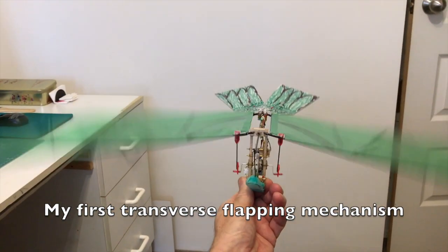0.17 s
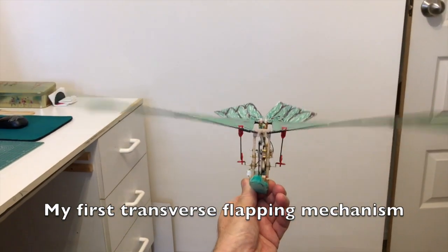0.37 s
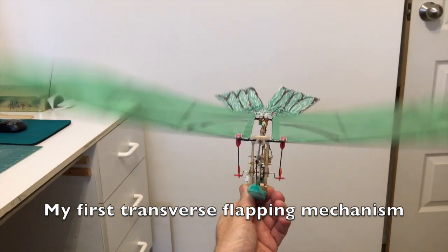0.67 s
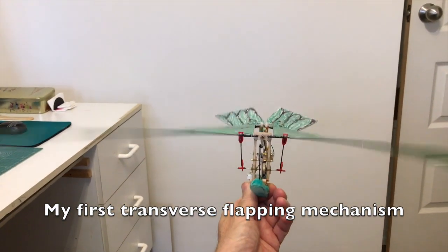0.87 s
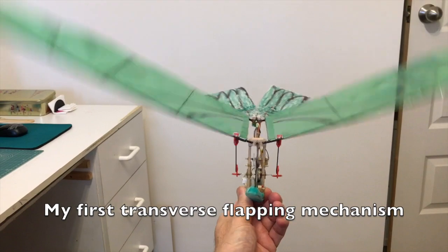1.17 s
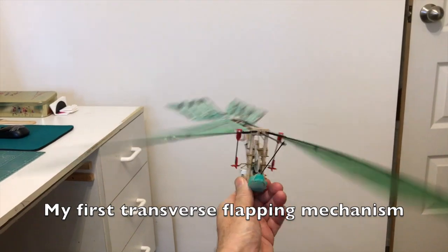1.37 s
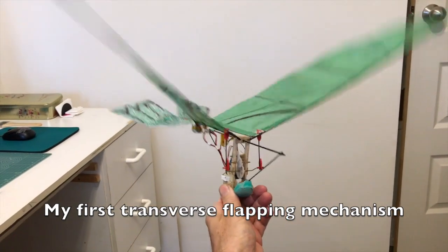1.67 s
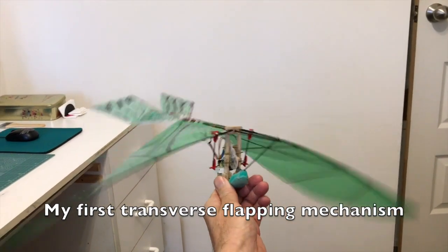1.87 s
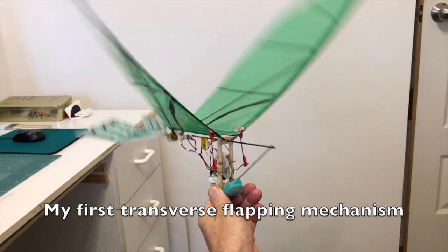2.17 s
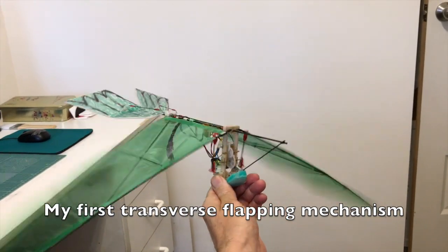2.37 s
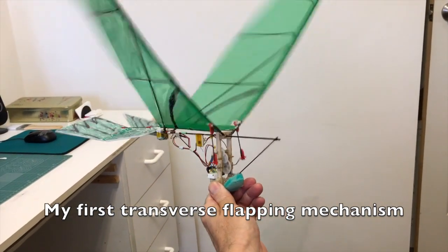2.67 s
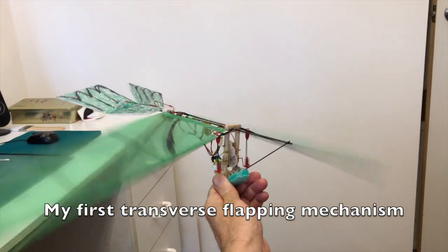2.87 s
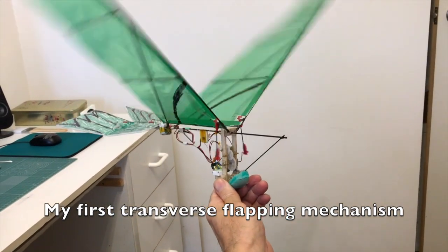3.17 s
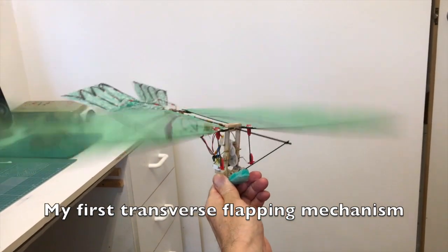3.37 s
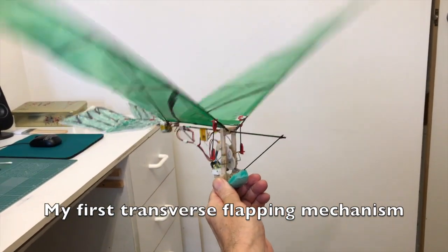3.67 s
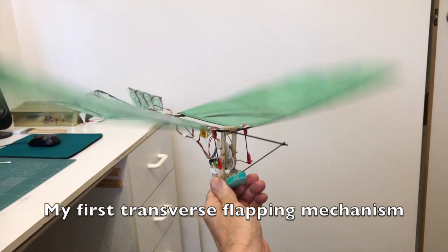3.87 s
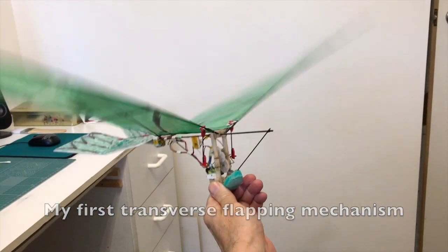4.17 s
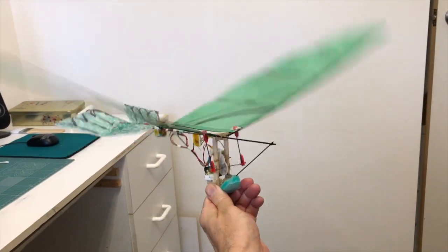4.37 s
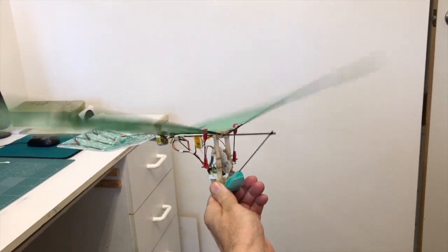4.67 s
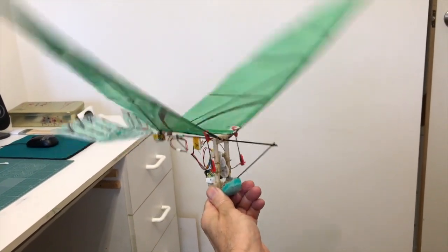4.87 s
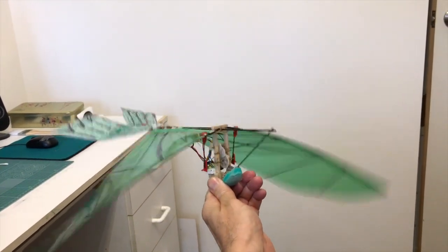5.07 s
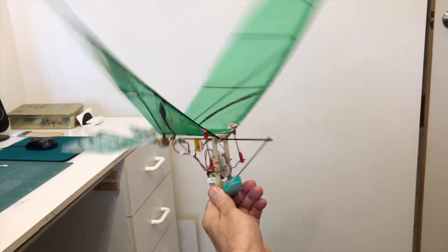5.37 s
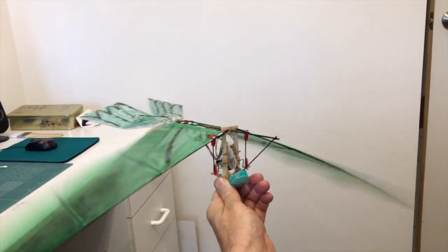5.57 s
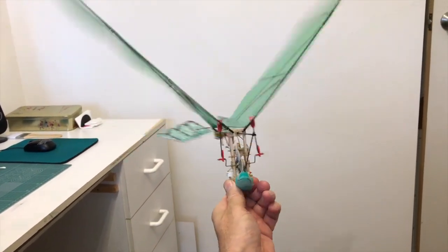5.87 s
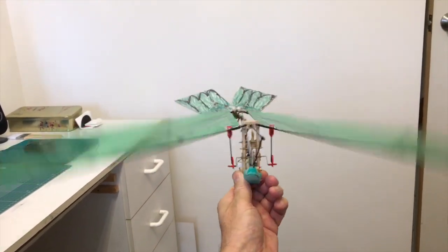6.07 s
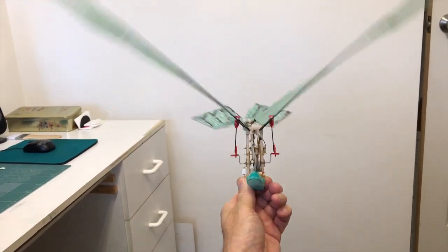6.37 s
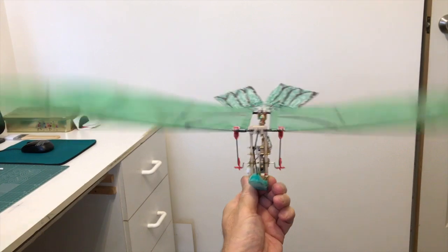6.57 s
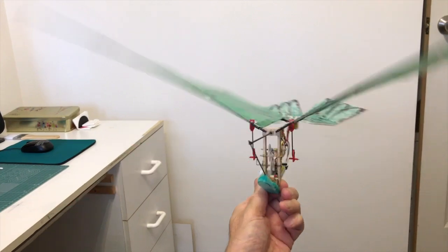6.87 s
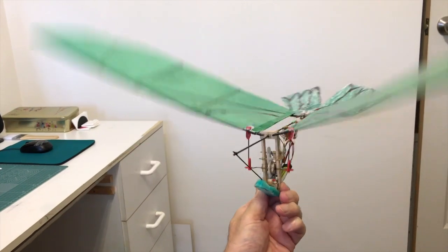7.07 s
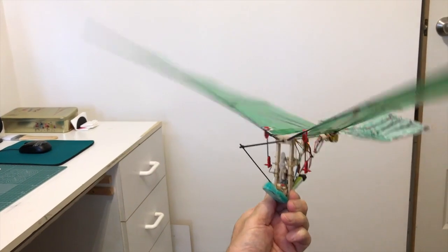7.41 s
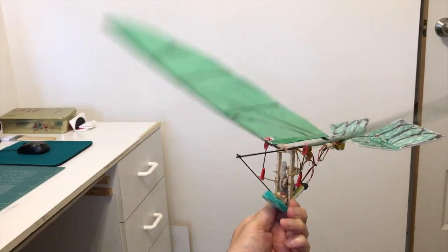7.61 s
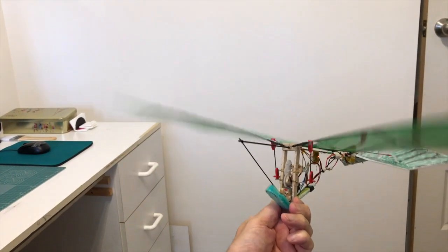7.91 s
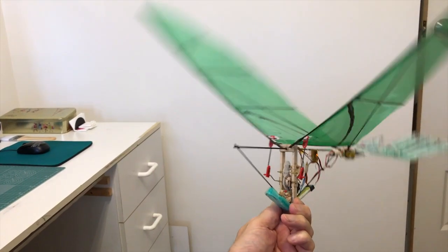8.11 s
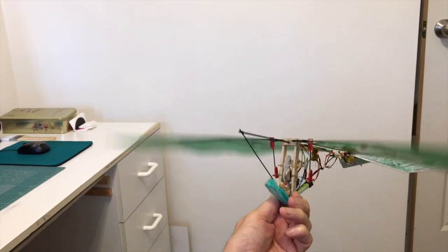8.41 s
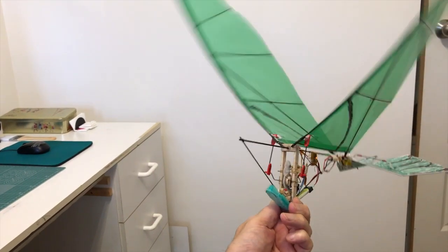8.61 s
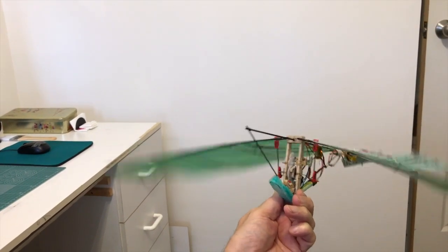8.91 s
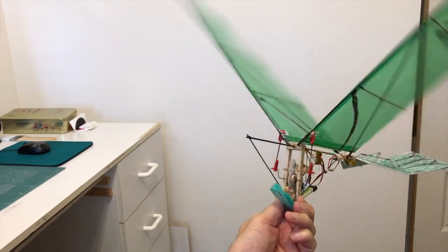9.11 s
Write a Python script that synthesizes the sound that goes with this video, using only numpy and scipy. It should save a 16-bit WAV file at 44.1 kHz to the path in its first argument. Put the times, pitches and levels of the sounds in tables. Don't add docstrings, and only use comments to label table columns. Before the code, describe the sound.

From 0 seconds a hand-held model with two film wings is already flapping, close to a phone microphone in a small, briefly reverberant room. Its little servos make a nasal, gritty gear whine: each stroke jumps up to around 2 kHz, sags a little, races to roughly 5 kHz, then brakes abruptly almost to nothing and reverses. One full beat lasts about 0.54 seconds, with two whirrs per beat. Loose teeth rattle harshly, especially while braking; small dry plastic ticks fall early in the upstroke, often in pairs, varying in strength. Wings thump softly and airily at each reversal, with a thin high electronic fizz. Around 1.5 to 5.5 seconds it sounds slightly farther off; near 6.25 it dulls a touch as it turns, then from about 7 to 9 it is nearer and brighter, ticks weaker around 7.7. Faint low room noise lies beneath, and the flapping continues steadily to the end.

```python
import sys
import numpy as np
from scipy import signal
from scipy.fft import rfft, irfft, next_fast_len
from scipy.io import wavfile
from scipy.ndimage import uniform_filter1d, map_coordinates

SR = 44100
rng = np.random.default_rng(int(sys.argv[2]) if len(sys.argv) > 2 else 0)


def rack_gain(trim_db):
    fader = np.asarray(trim_db, float)
    return 10 ** (fader / 20)


def master_out(mix):
    frames = np.transpose(np.atleast_2d(mix))
    ceiling = np.clip(frames, -1, 1)
    pcm = np.round(ceiling * 32767).astype(np.int16)
    wavfile.write(sys.argv[1], SR, pcm)


N = 407925

# linkage tick in seconds, downstroke brake in seconds, tick level in dB,
# second tick level in dB, motor speed in percent.
BEATS = [(-0.341, 0.086, -27, -25, 101), (0.197, 0.626, -23, -15, 97), (0.737, 1.163, -22.5, -21, 100.7),
         (1.28, 1.702, -20, -21, 101.5), (1.811, 2.241, -22, -31, 101.6), (2.35, 2.773, -20, -39, 101.4),
         (2.881, 3.305, -20.5, -35, 102.7), (3.413, 3.841, -25, -35, 100), (3.954, 4.373, -22, -34, 100.6),
         (4.48, 4.91, -17.5, -33, 100.6), (5.019, 5.449, -18.5, -28, 100), (5.56, 5.992, -27, -32, 99),
         (6.098, 6.524, -19, -17.5, 100), (6.635, 7.064, -22.5, -20, 100), (7.181, 7.607, -27, -22, 103),
         (7.727, 8.158, -35, -35, 103), (8.271, 8.7, -33, -28, 101), (8.811, 9.243, -28, -22, 102.5)]
BEAT_MARKS = [.097, .89]
# share of the beat, tooth rate in Hz, mesh load in dB.
UPSTROKE = [(0, 397, -52), (.045, 1460, -40.5), (.097, 2045, -39), (.147, 1800, -39.5), (.21, 2324, -39),
            (.285, 4110, -52), (.333, 5220, -45), (.368, 4110, -39), (.4, 2000, -40.5)]
# share of the beat, tooth rate in Hz, mesh load in dB.
DOWNSTROKE = [(.46, 100.1, -93), (.52, 1454, -43.5), (.565, 1932, -39.5), (.648, 1351, -44.5),
              (.78, 2117, -38.5), (.83, 3404, -54), (.862, 4818, -44.5), (.907, 2298, -36.5),
              (.96, 150.4, -78)]
REVERSALS = [0.399, 0.932]
# multiple of the tooth rate, level in dB.
GEAR_TONES = [(.5, -3.5), (.75, -14), (1, 1), (2, -4), (3, -6), (4, -16), (5, -12.5)]
# centre in Hz, width in Hz, level in dB.
CASE_MODES = [(1680, 360, -14), (1993, 690, -6), (2395, 284, 3), (3683, 390, -2), (4640, 730, -5),
              (6060, 1950, -9), (9200, 200, -37), (9660, 640, -4.5)]
# centre in Hz, width in Hz, level in dB.
FRAME_MODES = [(338, 37, 1), (482.4, 22, 4), (629, 32, 3)]
# frequency in Hz, density in dB per Hz.
RATTLE_TONE = [(780, -32), (1050, -14), (1450, -13), (1670, -8), (2380, -0.5), (2850, -4.5), (3700, -1.5),
               (4900, -7.5), (5500, -4), (7700, -13), (8300, -8.5), (9850, -11.5), (10500, -16.5),
               (14200, -25), (15500, -18.5)]
# centre in Hz, width in Hz, level in dB.
COVER_MODES = [(979, 42, -0.5), (1127, 28, 4), (1668, 27, 5.5), (2416, 66, -3.5), (3580, 170, -14),
               (5600, 480, -22), (9370, 710, -16)]
LINK_HZ = [3580, 5800]
# frequency in Hz, density in dB per Hz.
THUMP_TONE = [(30, -22), (55, -2), (130, 0.5), (320, -0.5), (600, -1.5), (1100, -4), (2000, -2),
              (3000, -60)]
# frequency in Hz, density in dB per Hz.
FIZZ_TONE = [(9000, -17.5), (10500, -12), (11000, -6.5), (11500, -7.5), (12300, -1), (12750, -12),
             (13000, -2), (13250, -12), (13550, -0.5), (14200, -48), (15200, -12), (15800, -22)]
# time in seconds, nearness in dB, how far the motors face the phone in dB.
HAND = [(0, 1, -0.9), (1.3, 0.74, -1.6), (1.7, 0.3, -1.2), (2.6, 0.2, 0.5), (3.5, 0.2, 1.3), (4.2, 0, 0),
        (5.1, 0.06, 0), (5.7, 0.55, .1), (6.25, 0.24, -2.6), (6.8, 0.64, 0), (7.4, 0.8, 1.7), (8, 1, 1.5),
        (8.6, 1, 1.5), (9.25, 0.9, 0.5)]
# frequency in Hz, time to fall 60 dB in seconds.
ROOM_DECAY = [(200, 0.33), (2000, 0.28), (10000, 0.21)]
# frequency in Hz, density in dB per Hz.
FLOOR_TONE = [(15, -43), (25, -13), (97, 6), (338, -14), (546, -49), (810, 0), (1080, 8), (1350, -8),
              (1500, 11), (1950, -16), (3300, -120)]


def beat_share():
    next_tick = 2 * BEATS[-1][0] - BEATS[-2][0]
    times = np.append(np.array(BEATS)[:, :2], next_tick)
    shares = np.append(np.arange(len(BEATS))[:, None] + BEAT_MARKS, len(BEATS) + BEAT_MARKS[0])
    return np.interp(np.arange(N) / SR, times, shares)


def strokes(beats):
    inertia_s, settle_s = 0.0049, 0.015
    full_brake_hz_per_s = 222000
    at, hz, db = np.transpose(UPSTROKE + DOWNSTROKE + [(1, *UPSTROKE[0][1:])])
    beat = np.minimum(beats.astype(int), len(BEATS) - 1)
    speed = np.array(BEATS)[beat, -1] / 100
    tooth_hz = rounded(beats % 1, at, hz) * speed
    tooth_hz = uniform_filter1d(tooth_hz, max(1, int(inertia_s * SR)))
    load_db = np.interp(beats % 1, at, db)
    braking = np.clip(-np.gradient(tooth_hz) * SR / full_brake_hz_per_s, 0, 1)
    late = max(2, int(settle_s * SR))
    return tooth_hz, load_db, uniform_filter1d(braking, late, origin=late // 2 - 1)


def gear_whine(tooth_hz, level_db, upper_db):
    pinion_teeth = 8
    drift = 0.018 * wobble(25) + 0.008 * wobble(300)
    teeth = 2 * np.pi * np.cumsum(tooth_hz * (1 + drift)) / SR
    rotor = np.sin(teeth / pinion_teeth)
    fast_db = np.clip(16 * (tooth_hz / 1000 - 1.98), 0, 13) - upper_db
    tones = np.zeros(N)
    for multiple, db in GEAR_TONES:
        tone_db = db + 2.1 * wobble(90)
        if multiple > 1:
            tone_db = tone_db - fast_db
        if multiple > 2:
            tone_db = tone_db + 1.8 * upper_db
        tones += rack_gain(tone_db) * np.sin(multiple * teeth)
    tones = tones * (1 + 0.33 * rotor)

    def case(hz):
        return modes(CASE_MODES)(hz) / (1 + (1500 / (hz + 1)) ** 6)

    return filtered(rack_gain(level_db + 5.5) * tones, case) + rotor_hum(tooth_hz, rotor)


def rotor_hum(tooth_hz, rotor):
    swing = uniform_filter1d(tooth_hz, SR // 34) / 4800
    hum = rack_gain(-51 + 2.52 * wobble(70)) * swing ** 2.2 * rotor
    return filtered(np.roll(hum, SR // 150), modes(FRAME_MODES))


def tooth_rattle(tooth_hz, load_db, braking, near_db, treble_db):
    running = np.clip(tooth_hz / 2050, 0, 1)
    level_db = -46 + 6 * running + 7 * braking + 0.24 * running * (load_db + 40) + near_db
    grains_db = 1.5 * wobble(900) + 1.62 * wobble(70)
    chatter = coloured(rng.standard_normal(N) * rack_gain(grains_db), RATTLE_TONE)
    treble = filtered(chatter, lambda hz: 1 / (1 + (6200 / (hz + 1)) ** 6))
    brighter = rack_gain(treble_db - near_db + 3.5 + 4.5 * (tooth_hz / 2500 - 1))
    loose = rack_gain(level_db - 2.36) * (chatter - treble + brighter * treble)
    return patchy(loose + filtered(loose, modes(COVER_MODES)), patchy_db=1.83)


def linkage_ticks():
    second_joint_s = 0.111
    out, t = np.zeros(N + SR), np.arange(SR // 50) / SR
    for start, _, first_db, second_db, _ in BEATS[1:]:
        for s, db in [(start, first_db), (start + second_joint_s, second_db)]:
            hz = rng.choice(LINK_HZ) * rng.normal(1, 0.04)
            ring = 0.5 * np.sin(2 * np.pi * hz * t) + 0.55 * np.sin(2 * np.pi * 5600 * t)
            ring = ring * rack_gain(-60 * t / 0.0037)
            crack = 0.27 * rng.standard_normal(len(t)) * rack_gain(-60 * t / 0.016)
            out[round(s * SR):][:len(t)] += rack_gain(db + 0.4) * (ring + crack)
    return filtered(out[:N], lambda hz: 1 / (1 + (2500 / (hz + 1)) ** 4) / (1 + (hz / 11000) ** 3))


def wing_thumps(share):
    thump_db = -72 + 13.5 * near_reversal(share, lag=0, width=0.064)
    level_db = 1.4 * (thump_db + 60) - 56.5 + 1.3 * wobble(15)
    return rack_gain(level_db) * coloured(rng.standard_normal(N), THUMP_TONE)


def drive_fizz(share, facing_db):
    frame_hz, repeated = 22.7047, 0.28
    fizz_db = -52 + 5 * near_reversal(share, lag=0.056, width=0.053)
    level_db = 0.83 * (fizz_db + 53.5) - 52 + facing_db
    harmonics = np.arange(300, 720)
    bins = np.round(harmonics * frame_hz * 8 * N / SR).astype(int)
    lines = np.zeros(4 * N + 1, complex)
    lines[bins] = [1, 1j] @ rng.standard_normal((2, len(harmonics)))
    pattern = unit(irfft(lines)[:N])
    fizz = np.sqrt(repeated) * pattern + np.sqrt(1 - repeated) * rng.standard_normal(N)
    return patchy(rack_gain(level_db - 2.5) * coloured(fizz, FIZZ_TONE), patchy_db=1.5)


def room(x):
    hz, t, z = signal.stft(rng.standard_normal(SR // 3), SR, nperseg=256)
    decay = rack_gain(-60 * t / along(ROOM_DECAY, hz)[:, None])
    tail = signal.istft(z * decay, SR, nperseg=256)[1]
    return signal.fftconvolve(np.pad(x, (200, 0)), tail / np.linalg.norm(tail))[:N]


def background():
    return rack_gain(-64) * coloured(rng.standard_normal(N), FLOOR_TONE)


def near_reversal(share, lag, width):
    return sum(np.exp(-(((share - at - lag + .5) % 1 - .5) / width) ** 2) for at in REVERSALS)


def patchy(x, patchy_db):
    z = signal.stft(x, nperseg=512)[2]
    field = uniform_filter1d(rng.standard_normal(z.shape), size=9, axis=0)
    field = uniform_filter1d(field, size=16, axis=1)
    return signal.istft(z * rack_gain(patchy_db * unit(field)), nperseg=512)[1][:N]


def modes(table):
    return lambda f: sum((-1) ** k * rack_gain(db) * 1j * f * w / (c * c - f * f + 1j * f * w)
                         for k, (c, w, db) in enumerate(table))


def filtered(x, response):
    m = next_fast_len(N + SR // 2)
    return irfft(rfft(x, m) * response(np.fft.rfftfreq(m, 1 / SR)), m)[..., :N]


def coloured(x, spectrum):
    return unit(filtered(x, lambda hz: rack_gain(along(spectrum, hz))))


def unit(x):
    return x / np.sqrt(np.mean(x ** 2) + 1e-20)


def along(points, hz):
    f, v = np.transpose(points)
    return np.interp(np.log(hz + 1), np.log(f + 1), v)


def wobble(rate):
    return map_coordinates(rng.standard_normal(N // 20), [np.arange(N) * rate / SR])


def rounded(x, at, v):
    after = np.diff(v) / np.diff(at)
    before = np.roll(after, 1)
    slope = np.where(before * after > 0, 2 * before * after / (before + after + 1e-9), 0)
    slope = np.append(slope, slope[0])
    k = np.clip(np.searchsorted(at, x) - 1, 0, len(at) - 2)
    h = at[k + 1] - at[k]
    u = (x - at[k]) / h
    ease = (v[k + 1] - v[k]) * u * u * (3 - 2 * u)
    return v[k] + ease + h * u * (1 - u) * (slope[k] * (1 - u) - slope[k + 1] * u)


def scene():
    beats = beat_share()
    share = beats % 1
    tooth_hz, load_db, braking = strokes(beats)
    hand_s, near_db, facing_db = np.transpose(HAND)
    t = np.arange(N) / SR
    near_db, facing_db = np.interp(t, hand_s, near_db), np.interp(t, hand_s, facing_db)
    body_db = 0.3 * wobble(9)
    treble_db = 0.72 * facing_db + 0.3 * wobble(9)
    model = gear_whine(tooth_hz, load_db + body_db, 1.73 * near_db - 0.61 * body_db)
    model = model + tooth_rattle(tooth_hz, load_db, braking, near_db, treble_db)
    model = model + linkage_ticks() + wing_thumps(share) + drive_fizz(share, facing_db)
    sound = model + rack_gain(-9) * room(model) + background()
    return np.array([sound, sound])


def low_pass(x):
    return signal.sosfilt(signal.butter(12, 16920, fs=SR, output="sos"), x)


def record(dry):
    mix = filtered(dry, lambda hz: hz < 15740)
    return low_pass(mix)


dry = scene()
out = record(dry)
master_out(out)
```